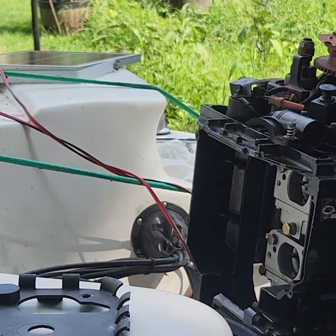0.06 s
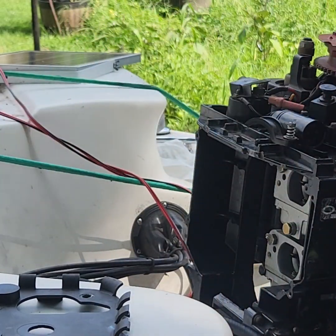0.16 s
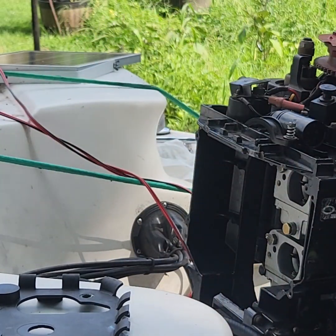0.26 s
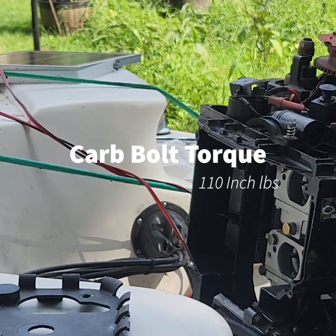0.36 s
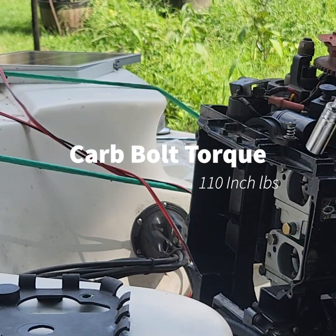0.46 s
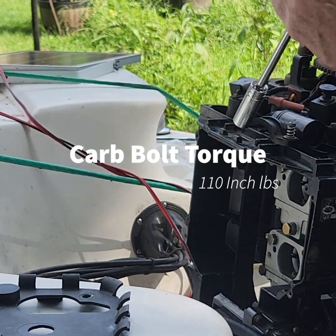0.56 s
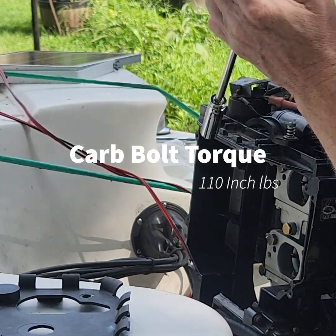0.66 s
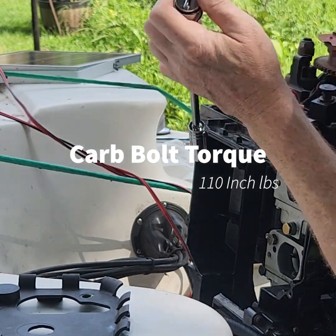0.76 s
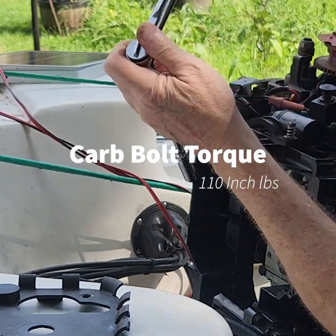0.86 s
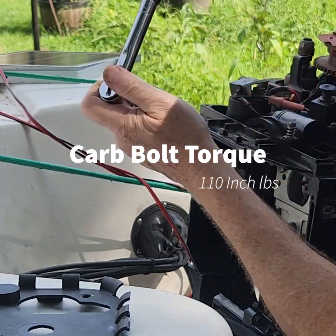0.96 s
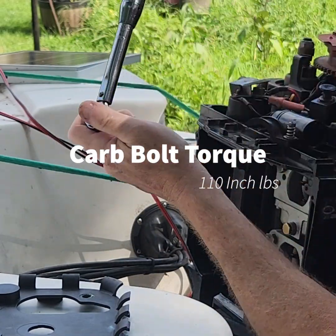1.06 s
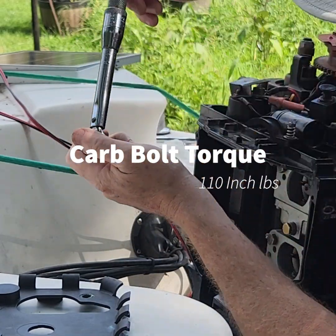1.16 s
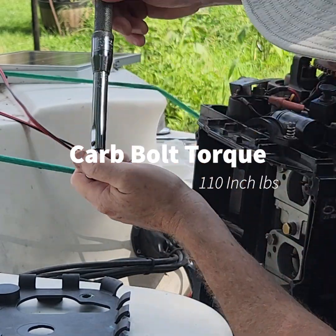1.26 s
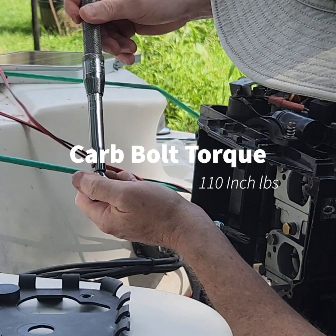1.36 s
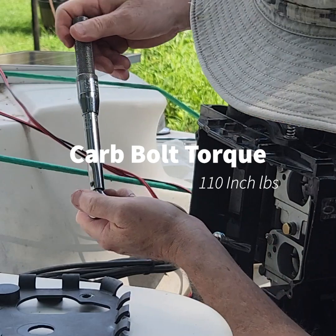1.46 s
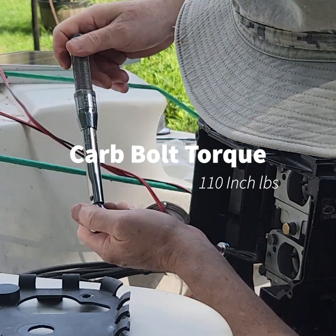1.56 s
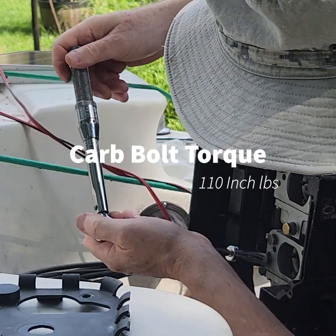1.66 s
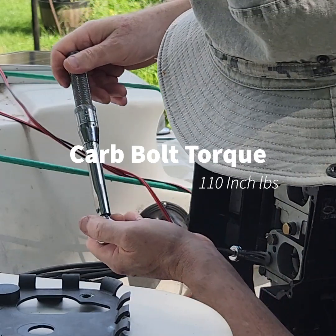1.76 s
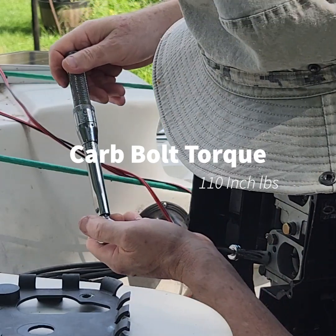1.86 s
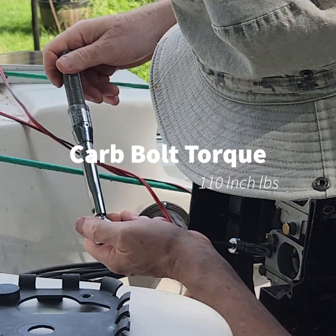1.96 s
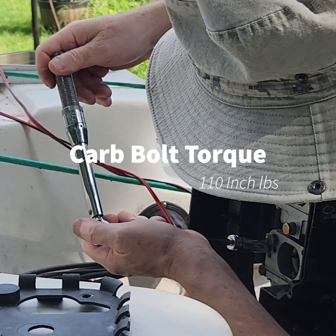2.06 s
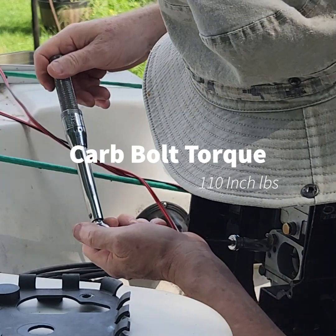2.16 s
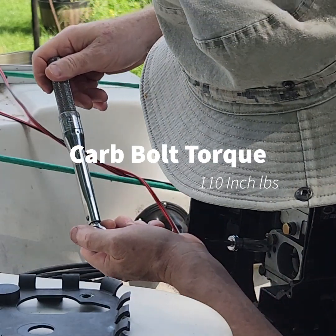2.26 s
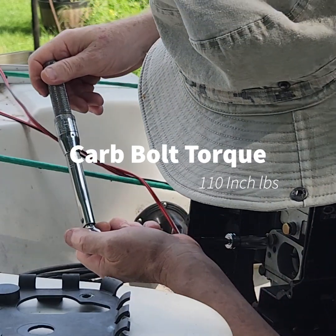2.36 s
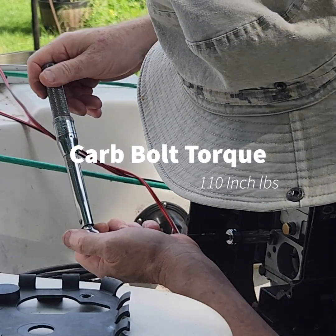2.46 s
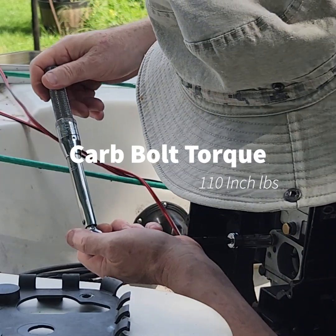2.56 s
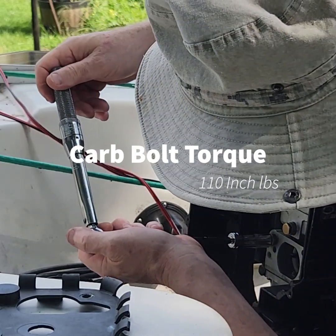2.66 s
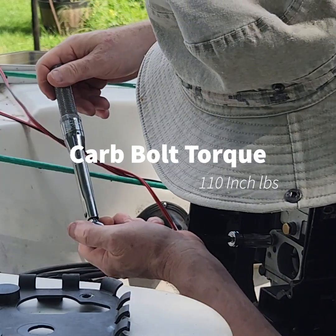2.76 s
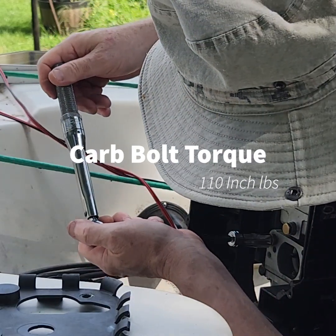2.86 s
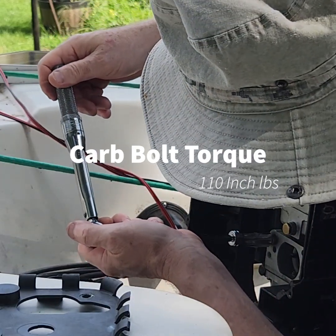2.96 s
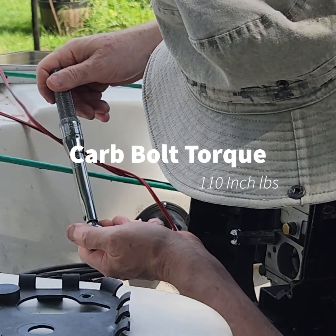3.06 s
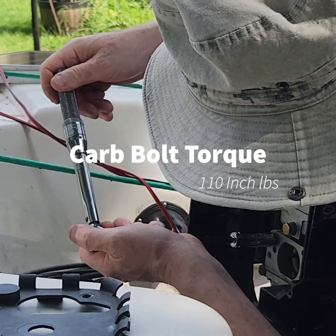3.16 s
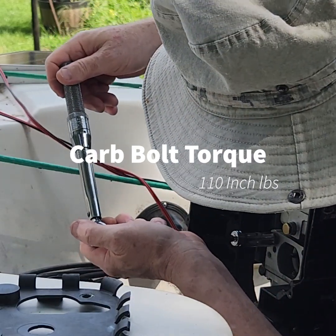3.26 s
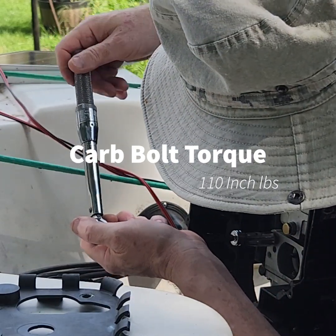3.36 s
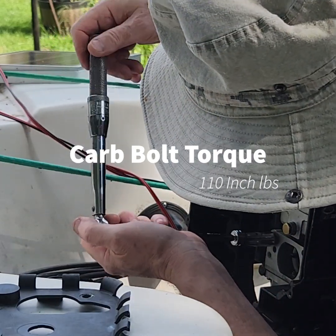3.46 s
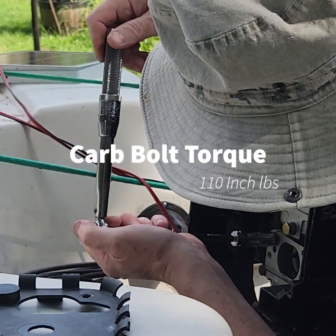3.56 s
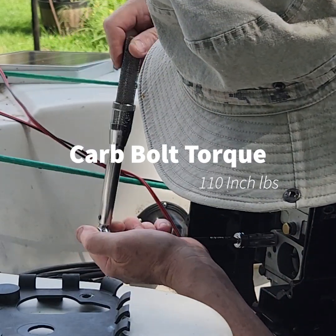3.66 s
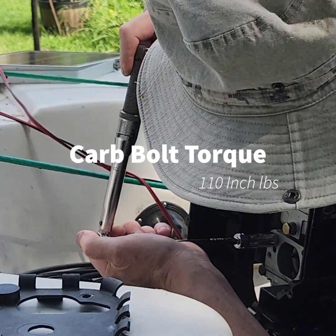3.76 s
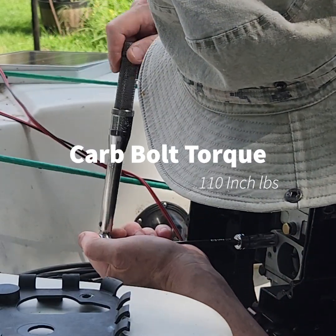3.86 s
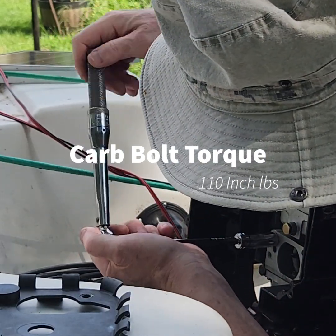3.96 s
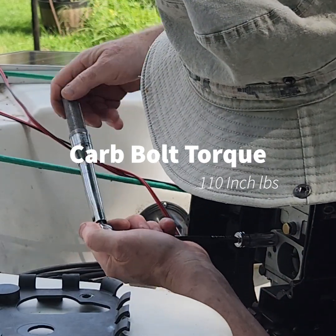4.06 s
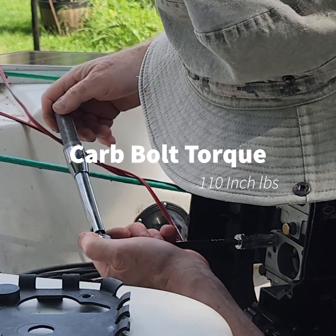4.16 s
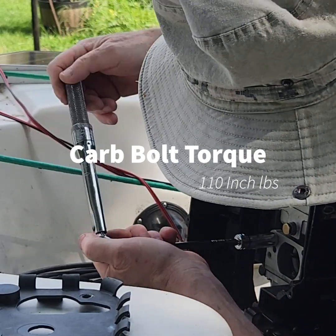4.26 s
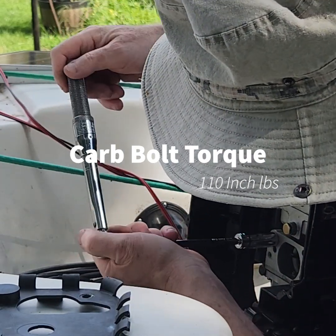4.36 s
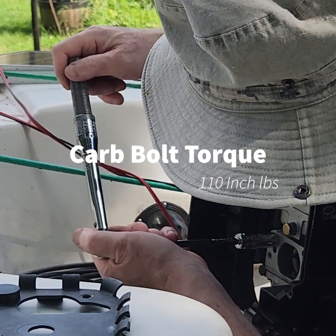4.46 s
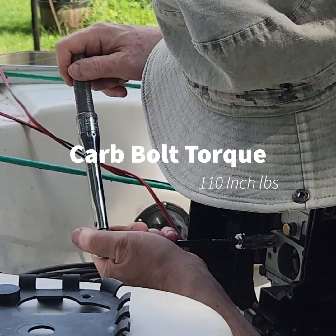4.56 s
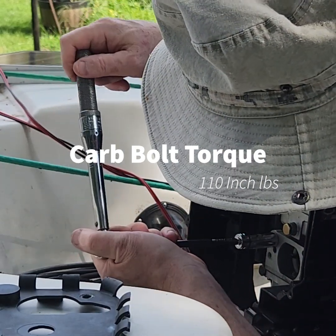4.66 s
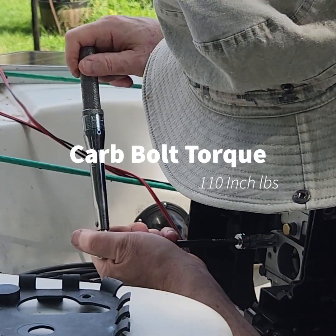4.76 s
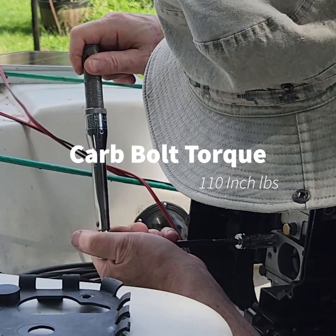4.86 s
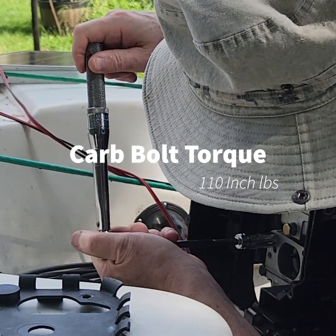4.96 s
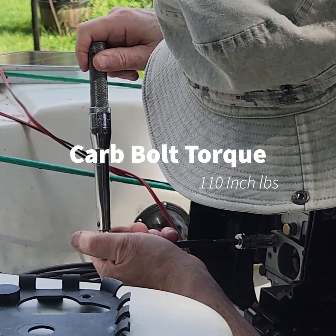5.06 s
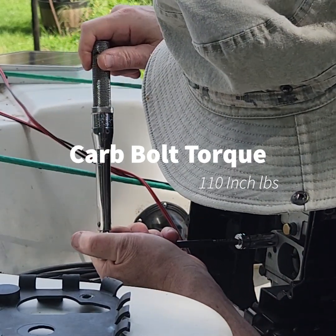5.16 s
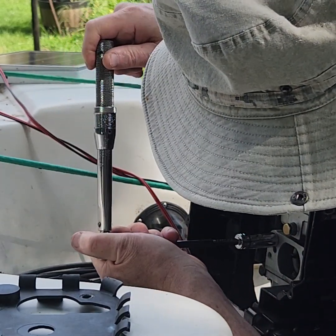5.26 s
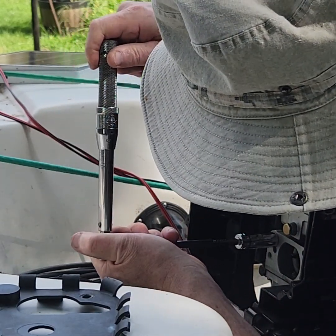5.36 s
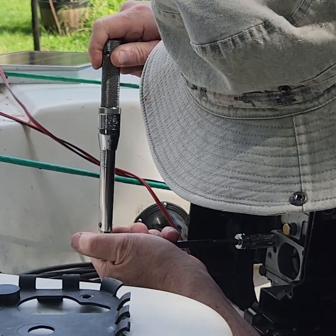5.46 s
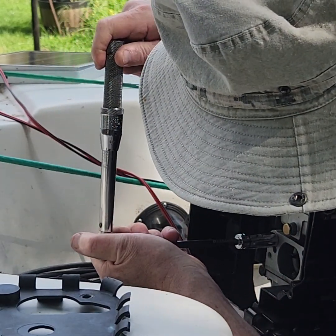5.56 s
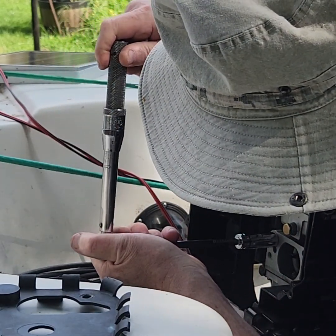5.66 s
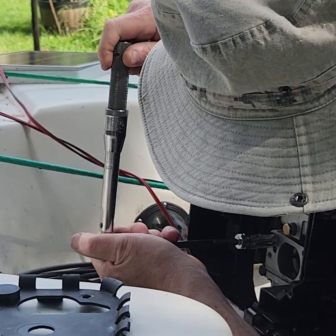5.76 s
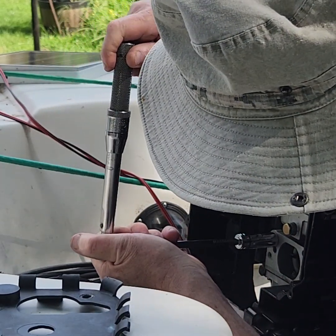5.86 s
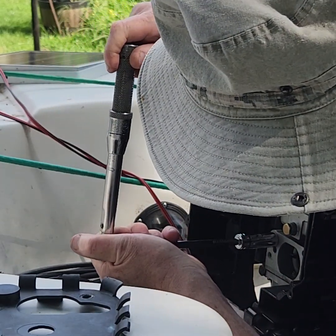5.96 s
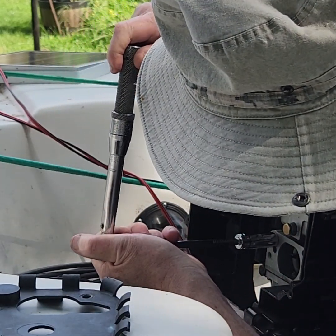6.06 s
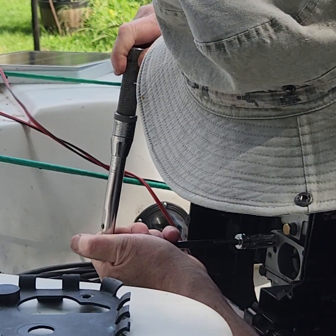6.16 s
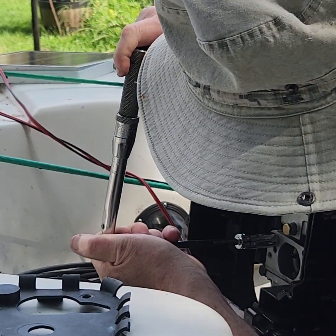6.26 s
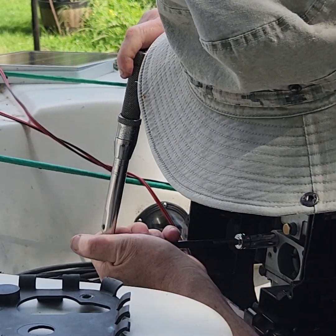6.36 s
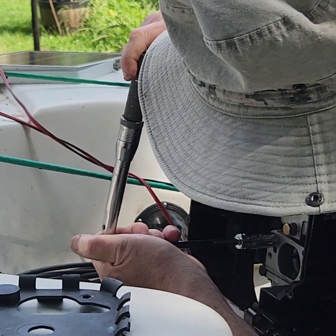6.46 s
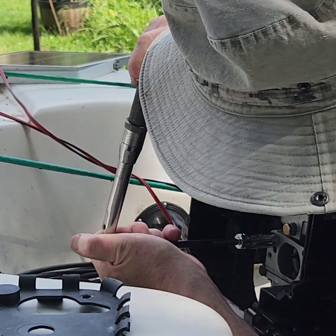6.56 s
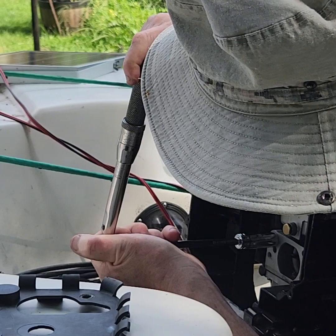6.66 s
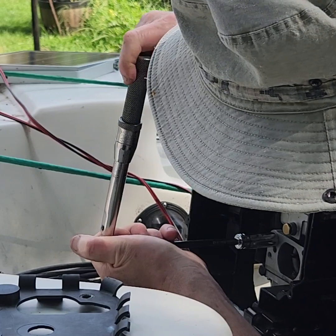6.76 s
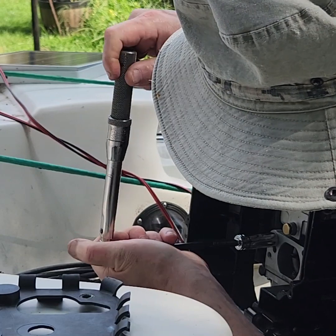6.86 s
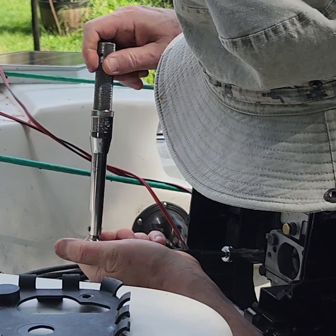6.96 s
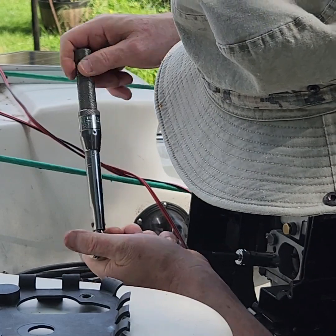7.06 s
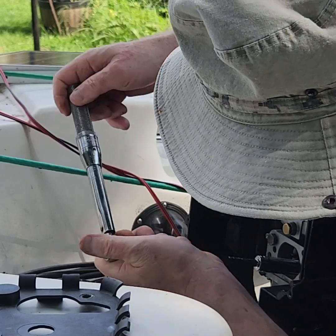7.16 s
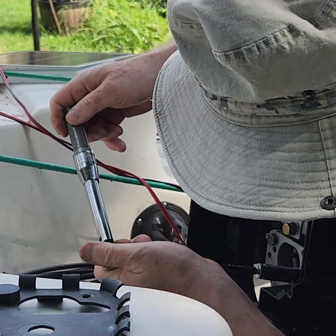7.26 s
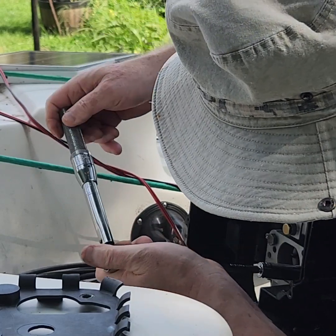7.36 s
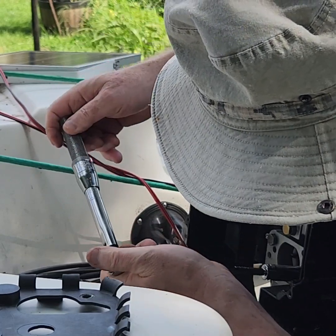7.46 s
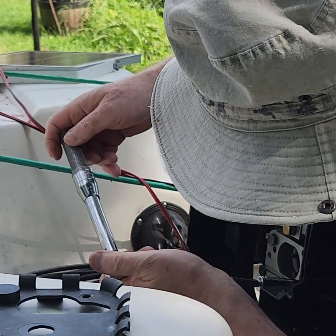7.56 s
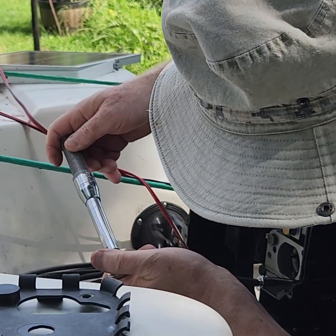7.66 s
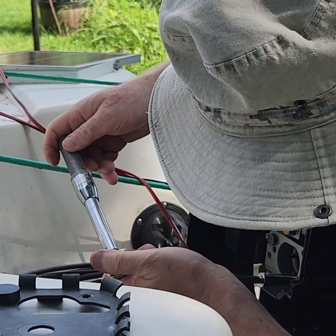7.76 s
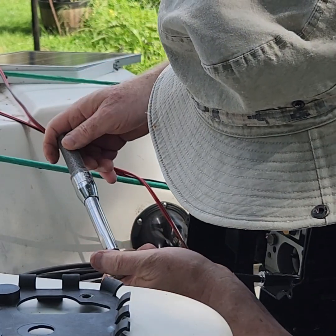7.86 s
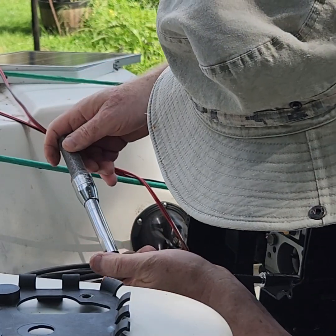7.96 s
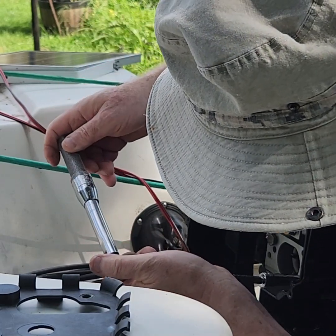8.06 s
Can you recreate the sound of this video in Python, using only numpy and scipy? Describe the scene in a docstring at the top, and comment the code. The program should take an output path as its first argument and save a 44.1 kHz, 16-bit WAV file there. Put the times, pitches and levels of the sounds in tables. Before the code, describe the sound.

High, even cricket chirring fills a garden, over a low distant rumble and occasional faint jay cries. Nearby, a torque wrench works on an outboard engine: scattered short metal knocks, a brief run of light ratchet ticks, then a loud crisp click and a second, softer click as it resets. A few clinks follow. Handling adds soft rustles and dull thumps on the boat hull.

```python
"""A click-type torque wrench tightens a bolt on an outboard engine, close by in a garden.
The socket knocks on the bolt, the ratchet swings back, the wrench breaks over with a loud click and
resets; each impact rings the same steel modes. Bumps of hand and tool set the hull booming.
Crickets chirr with their wings throughout. Jays cry far off over a low rumble, soft rustles
and a brief opening hiss."""
import sys
import numpy as np
from scipy import signal
from scipy.fft import rfft, irfft, next_fast_len
from scipy.io import wavfile

SR = 44100
rng = np.random.default_rng(int(sys.argv[2]) if len(sys.argv) > 2 else 0)


def transcribe(u):
    """Save the signal u as a 16-bit wav file named by the first command-line argument.

    u: samples, shape (n,) or (channels, n), limited to [-1, 1]; the rate is SR.
    q: integer samples, one column per channel.
    """
    v = np.clip(np.atleast_2d(u).T, -1, 1)
    q = np.round(v * 32767).astype(np.int16)
    wavfile.write(sys.argv[1], SR, q)


N = 358091
TIME = np.arange(N) / SR


def wrench():
    """Steel impacts, direct and scattered from near and far surfaces."""
    steel = socket_knocks() + break_over() + ratchet()
    steel[1] = np.roll(steel[1], 2)  # left ear is nearer
    near = scatter(steel, t60_s=0.11, wet_db=-8.5, build_s=0.0058, treble_db=-5)
    far = scatter(steel, t60_s=0.45, wet_db=-25, build_s=0.035, treble_db=-12)
    return (steel + near + far) * pan(2.1)


# Break-over, then reset: t/s, level/dB, favoured f/Hz, dullness/dB, chatter/s
CLICKS = [(6.5289, -12.5, 3110, -2.5, 0.00034), (6.7707, -17.5, 1500, 5.5, 0.0022)]
DULLING = np.array([0.89, 0.39, 0.32, -1.3])  # tint per dB of dullness


def break_over():
    """The wrench trips at its set torque, then resets, each with a dry crack."""
    out = np.zeros((2, N))
    for s, db, favoured_hz, dull_db, chatter_s in CLICKS:
        tint_db = np.array([0, -2.5, 6, 11.5]) + dull_db * DULLING
        click = strike(tint_db, favoured_hz, chatter_s, crack_db=-6.5, crack_t60_s=0.016, favour_db=8)
        add(out, s, undb(db) * click)
    return out


# Socket on bolt: t/s, level/dB, favoured f/Hz, dullness/dB, chatter/s
KNOCKS = [(0.35, -43, 1680, -8, .002), (0.451, -51.5, 900, 19, .003), (0.837, -44.5, 360, 25, 0.015),
          (1.7069, -27, 1345, -6.5, .006), (2.071, -30.5, 4000, 1, .004), (2.1034, -45.5, 1410, 17, .003),
          (2.512, -29, 3000, -2, 0.015), (2.9788, -28, 2510, -5.5, 0.005), (3.058, -34.5, 2570, -9, .004),
          (3.0811, -27, 1130, 2.5, .004), (3.602, -31.5, 1250, 5, .003), (3.61, -17.5, 2720, -2, 0.0055),
          (4.3885, -46, 2300, 5, .004), (6.96, -44, 3480, -1, .006), (7.401, -24.5, 3340, -7, 0.012),
          (7.523, -29, 3070, 2, 0.0078), (7.546, -38.5, 1080, 8, .005), (7.822, -40.5, 1520, 15.5, 0.01)]


def socket_knocks(firm_above_db=-26, chatter_halving_db=12):
    """Soft, heavy contacts sound dull; firmly seated ones are brighter and chatter less."""
    out = np.zeros((2, N))
    brightening = np.array([0, 0, 1.1, 2.5])
    for s, db, favoured_hz, dull_db, chatter_s in KNOCKS:
        firm_db = max(db - firm_above_db, 0)
        tint_db = np.array([-6, 1, -10.5, -22.5]) + dull_db * DULLING + firm_db * brightening
        chatter_s *= 0.5 ** (firm_db / chatter_halving_db)
        add(out, s, undb(db) * strike(tint_db, favoured_hz, chatter_s, favour_db=9.5))
    return out


# Pawl drops: t/s, level/dB, rebound delay/s
PAWL_DROPS = [(3.921, -37, 0.0083), (3.9536, -36.5, 0.0049), (3.984, -33.5, 0.0049),
              (4.0190, -38.5, 0.0051), (4.0720, -41.5, .013)]


def ratchet(tint_db=(-33, -17, 9, 18.5), rebound_db=-7):
    """The tiny pawl drops over each tooth, rings high and rebounds."""
    out = np.zeros((2, N))
    for s, db, delay_s in PAWL_DROPS:
        drop = strike(tint_db, favoured_hz=3440, chatter_s=0.0004, crack_db=-8.5, crack_t60_s=0.015)
        rebound = strike(tint_db, favoured_hz=3370, chatter_s=0.0041, crack_db=-7, crack_t60_s=0.031)
        add(out, s, undb(db) * drop)
        add(out, s + delay_s, undb(db + rebound_db) * rebound)
    return colour(out, [(2300, -2), (3300, -1), (5000, -1.5), (11000, -4), (15000, 5.5)])


# Modes of wrench, extension and engine casting: f/Hz, level/dB, t60/s
STEEL_MODES = [(393, -22.5, 0.072), (560, -18.5, 0.045), (696, -26, 0.071), (880, -10, 0.028),
               (1045, -19.5, 0.064), (1174, -18, 0.03), (1277, -22, 0.075), (1460, -10, 0.028),
               (2118, -23.5, 0.087), (2412, -27, 0.082), (2806, -19.5, 0.062), (3257, -12, 0.0093),
               (3460, -21.5, 0.031), (3720, -18, 0.015), (4700, -23, 0.016), (5550, -8, 0.011),
               (6170, -24, 0.019), (7320, -14, 0.029), (7440, 1, 0.012), (8450, -10.5, 0.019),
               (9100, -22.5, 0.019), (10840, -31, 0.011), (11020, -14, .011), (12350, -24, 0.0081),
               (15950, -14.5, .007)]
# Tint bands (thud, clank, 0 dB reference, ring, snap): f/Hz
TINT_HZ = (800, 1350, 3000, 5200, 11000)


def strike(tint_db, favoured_hz, chatter_s, crack_db=-8, crack_t60_s=0.021, favour_db=7):
    """One blow: the modes ring and the steel faces chatter in a short crack."""
    t = TIME[:SR // 10]
    thud_db, clank_db, ring_db, snap_db = tint_db

    def excitation(hz):
        """The contact point favours some modes; low ones build up more slowly."""
        broad_db = np.interp(np.log(hz), np.log(TINT_HZ), [thud_db, clank_db, 0, ring_db, snap_db])
        peak_db = favour_db * np.exp(-(np.log2(hz / favoured_hz) / 0.15) ** 2)
        return undb(broad_db + peak_db) * (1 - np.exp(-t * hz / 1.7))

    ring = crack = 0
    for k, (hz, db, t60_s) in enumerate(STEEL_MODES):
        phase = k * np.pi / 2 + 0.5 * rng.standard_normal((2, 1))  # differs at each ear
        ring += undb(db) * excitation(hz) * fade(t, t60_s) * np.sin(2 * np.pi * hz * t + phase)
    noise = rng.standard_normal(len(t)) + 1.78 * rng.standard_normal((2, len(t)))
    for hz in 300 * 2 ** (np.arange(24) / 4):  # quarter octaves
        band = filtered(noise, lambda f: np.maximum(1 - 4 * abs(np.log2(f / hz)), 0))
        t60_s = crack_t60_s * (hz / 3000) ** -0.4 + 3 * chatter_s
        envelope = excitation(hz) * fade(t, t60_s) * np.sqrt(crack_t60_s / t60_s)
        band_db = np.interp(hz, [350, 1000, 5000, 11000, 16000], [-18, 6.5, 0.5, -8.5, -12])
        crack += undb(band_db) * envelope * band
    return ring + undb(crack_db) * crack


# Bumps of hand and tool: t/s, level/dB
BUMPS = [(0.833, -33.5), (0.921, -38), (2.859, -41), (3.958, -40), (4.12, -38), (4.263, -39), (6.53, -31.5),
         (6.776, -37.5), (7.402, -35), (7.528, -33.5)]
# Hull panel modes: f/Hz, level/dB, t60/s
HULL_MODES = [(50, 1.5, 0.12), (85.5, 4, 0.12), (128, -5, 0.075), (191.4, -10.5, 0.16), (316, 6, 0.022)]


def hull(attack_s=0.0069):
    """Each bump sets the boat's panels booming briefly."""
    out, t = np.zeros((2, N)), TIME[:SR // 4]
    attack = 1 - np.exp(-t / attack_s)
    for s, db in BUMPS:
        boom = sum(undb(mode_db) * fade(t, t60_s) * np.sin(2 * np.pi * (hz * t + rng.random()))
                   for hz, mode_db, t60_s in HULL_MODES)
        add(out, s, undb(db) * (boom * attack)[None])
    return out


# Wing spectrum of the chorus: f/Hz, relative level/dB
WING_SPECTRUM = [(4800, -49), (5520, -27.5), (5880, -30.5), (6250, -33.5), (6600, -26.5), (7000, -4),
                 (7350, 2), (7680, 4), (8000, -4.5), (8400, -17.5), (8900, -30), (9400, -85), (11800, -53),
                 (12900, -43), (15500, -37)]
# Single crickets that stand out: f/Hz, level/dB, stroke rate/Hz
SINGERS = [(6250, -75, 48), (6445, -70, 55), (6610, -64, 41), (6820, -65, 62), (7025, -61, 47)]


def crickets(count=40):
    """Each stroke drags a file of teeth and rings the wing; many singers merge into an even chirr."""
    t = TIME[::32]
    rates_hz, offsets = rng.uniform(35, 95, (count, 1)), rng.random((count, 1))
    scraping = np.maximum(np.sin(2 * np.pi * (rates_hz * t + offsets)), 0).sum(0)
    teeth = rng.standard_normal((2, N)) * np.sqrt(np.interp(TIME, t, scraping))
    chorus = level(colour(teeth, WING_SPECTRUM), -45.5) * undb(0.18 * walk(2.2))
    for hz, db, rate_hz in SINGERS:
        strokes = np.cumsum(rate_hz * (1 + 0.0474 * walk(5))) / SR
        wing = resonance(rng.standard_normal((2, N)), hz, width_hz=90)
        chorus += level(wing * (1 + 0.68 * np.sin(2 * np.pi * strokes)), db)
    return chorus * pan(4.45)


# Jay cries: t/s, length/s, level/dB, effort (0 mild, 1 scream)
CRIES = [(-.04, 0.14, -61, .6), (.252, 0.085, -56.5, .7), (1.101, 0.067, -55.5, .25),
         (2.003, 0.066, -63, 0.29), (2.742, .11, -61.5, 0.21), (5.261, 0.13, -61, 0),
         (5.59, .18, -58.5, .15), (5.85, .066, -59, 0.034), (5.92, 0.17, -55, 1), (6.233, .17, -54.5, 0.97)]
# Throat response: f/Hz, gain/dB
THROAT = [(1200, 1.5), (1700, -2.5), (2300, -2.5), (3000, 5), (3450, -4.5), (3900, -1), (4600, -15),
          (6000, -44)]


def jays(buzz_hz=780, jitter=0.026):
    """Falling cries: both sides of the syrinx whistle, a buzz adds overtones, trees smear them."""
    out = np.zeros((1, N))
    syrinx = [(1, 0, walk(700)), (0.89, -6, walk(700))]
    buzz_phase = 2 * np.pi * np.cumsum(buzz_hz * (1 + 2 * jitter * walk(600))) / SR
    for s, length_s, db, effort in CRIES:
        start_hz, fall_hz = 2127 - 240 * effort, 161.5 + 328.3 * effort
        overtone_db = -21.5 + 8.5 * effort + 75 * length_s  # screams and long cries are harsher
        inside = (TIME > s) & (TIME < s + length_s)
        progress, buzz = (TIME[inside] - s) / length_s, buzz_phase[inside]
        envelope = np.sqrt(np.sin(np.pi * progress))
        for ratio, side_db, wobble in syrinx:
            hz = ratio * (start_hz - fall_hz * progress ** 2) * (1 + jitter * wobble[inside])
            phase = 2 * np.pi * np.cumsum(hz) / SR
            overtones = sum(gain * np.sin(phase + k * buzz)
                            for k, gain in enumerate(undb([-4, 0, -10]), 1))
            cry = np.sin(phase) + undb(overtone_db) * np.sqrt(2 * progress) * overtones
            out[0, inside] += undb(db + side_db) * envelope * cry
    out = colour(out, THROAT)
    return 0.79 * out + scatter(out, t60_s=0.38, wet_db=1, build_s=0.0012, treble_db=3)


# Rumble spectrum: f/Hz, relative level/dB
RUMBLE_SPECTRUM = [(12, -50), (20, -23.5), (42, -0.5), (65, -0.5), (101, -4), (124, -10), (184, -15.5),
                   (327, -24), (359, -21.5), (403, -25.5), (825, -24.5), (1940, -38.5), (2130, -39.5),
                   (3790, -49), (5000, -51.5), (6500, -72.5), (11000, -120)]
# Stereo width: f/Hz, side minus mid/dB
RUMBLE_WIDTH = [(60, -22), (125, -16.5), (250, -11), (500, -2), (1500, 4), (4000, -1.5)]
# Slow drift: t/s, relative level/dB
RUMBLE_DRIFT = [(0.0, -48), (1.51, -48), (5.96, -49), (6.7, -47.5), (7.08, -48.5), (7.53, -46.5),
                (8.1, -48.5)]


def rumble():
    """Distant outdoor rumble, alike at both ears in the bass."""
    mid, side = rng.standard_normal((2, N))
    noise = mid + colour(side, RUMBLE_WIDTH) * np.array([[1], [-1]])
    drift_db = np.interp(TIME, *np.transpose(RUMBLE_DRIFT)) + 0.5 * walk(7.8)
    return level(colour(noise, RUMBLE_SPECTRUM) * undb(drift_db), -46) * pan(1.4)


# Rustles: peak t/s, level/dB, half length/s
RUSTLES = [(0, -58.5, 0.18), (3.137, -67, 0.67), (4.257, -61, 0.38), (6.405, -64.5, 0.86), (7.9, -67, 0.5)]


def rustle(rest_db=-82.5):
    """Sleeves and leaves stir in soft, flickering swells."""
    noise = level(resonance(rng.standard_normal((2, N)), hz=1704, width_hz=1210), 0)
    swells = sum(undb(db) * np.exp(-((TIME - s) / half_s) ** 2) for s, db, half_s in RUSTLES)
    return noise * (undb(rest_db) + swells) * undb(2.5 * walk(17))


def hiss(fade_db_per_s=33, end_s=0.4):
    """A thin hiss that fades and soon stops."""
    noise = resonance(rng.standard_normal((2, N)), hz=4600, width_hz=2600)
    return level(noise, -64) * undb(-fade_db_per_s * TIME) * (TIME < end_s)


def scatter(x, t60_s, wet_db, build_s, treble_db):
    """Reflections from hull, ground and trees build up and die away, different at each ear."""
    t = TIME[:SR]
    envelope = fade(t, t60_s) * (1 - np.exp(-t / build_s))
    tail = level(rng.standard_normal((2, SR)) * envelope, wet_db) / np.sqrt(SR)
    tail = colour(tail, [(3000, 0.0073), (9000, treble_db)])
    return signal.fftconvolve(x, tail, axes=1)[:, :N]


def undb(db):
    """Decibels to gain."""
    return 10 ** (np.asarray(db) / 20)


def level(x, db):
    """Set the rms level."""
    return x * undb(db) / np.sqrt(np.mean(x ** 2))


def pan(db):
    """Stereo gains, left louder by db."""
    return undb(np.array([[db], [-db]]) / 2)


def fade(t, t60_s):
    """Exponential decay."""
    return np.exp(-np.log(1000) * t / t60_s)


def filtered(x, gain):
    """Filter by gain(f/Hz)."""
    size = next_fast_len(x.shape[-1])
    hz = np.fft.rfftfreq(size, 1 / SR) + 1
    return irfft(rfft(x, size) * gain(hz), size)[..., :x.shape[-1]]


def colour(x, points):
    """Filter by (f/Hz, gain/dB) points."""
    hz, db = np.transpose(points)
    return filtered(x, lambda f: undb(np.interp(np.log(f), np.log(hz), db)))


def resonance(x, hz, width_hz):
    """Steep resonance, unity gain at centre."""
    return filtered(x, lambda f: (1 + 1j * (f * f - hz * hz) / (f * width_hz)) ** -2)


def walk(rate_hz):
    """Random drift, spread near 1."""
    return np.interp(TIME * rate_hz, np.arange(8192), rng.standard_normal(8192))


def add(out, s, sound):
    """Mix a sound in at s seconds."""
    start = max(int(s * SR), 0)
    out[:, start:start + sound.shape[1]] += sound[:, :N - start]


def scene():
    """Wrench in front, garden behind."""
    return wrench() + hull() + crickets() + jays() + rumble() + rustle() + hiss()


def record(dry):
    """Soft-clip the loudest peak, then cut the top."""
    ceiling, top_hz = 1.05, 15750
    lowpass = signal.ellip(8, 0.2, 70, top_hz, fs=SR, output="sos")
    return signal.sosfilt(lowpass, ceiling * np.tanh(dry / ceiling))


dry = scene()
out = record(dry)
transcribe(out)
```